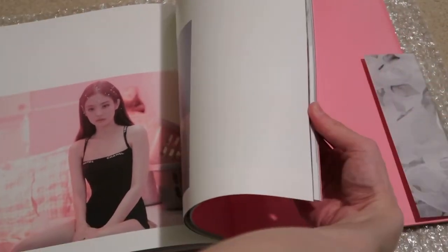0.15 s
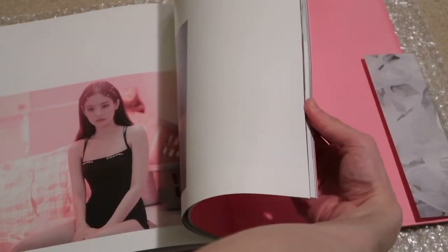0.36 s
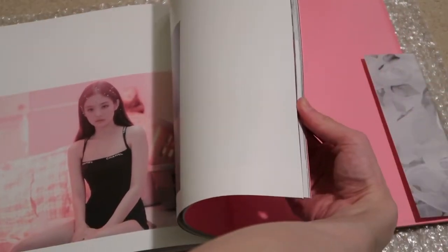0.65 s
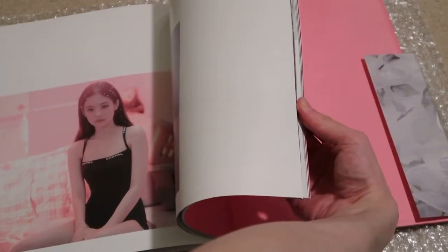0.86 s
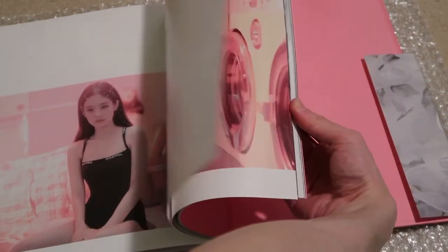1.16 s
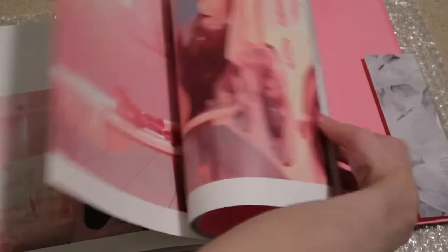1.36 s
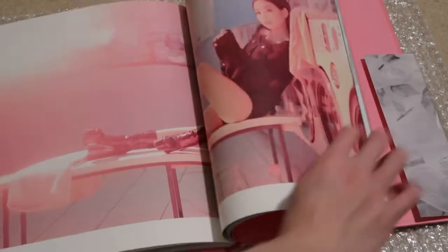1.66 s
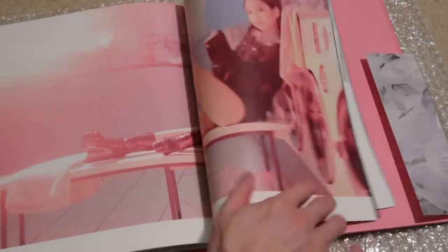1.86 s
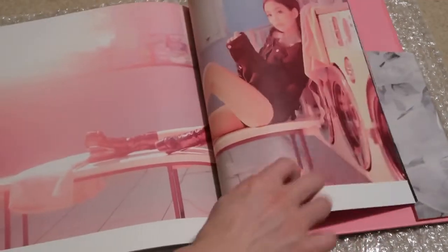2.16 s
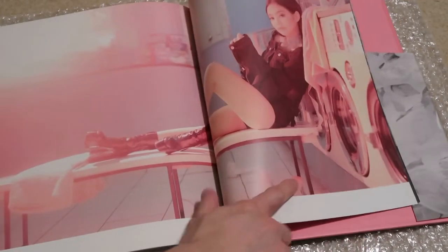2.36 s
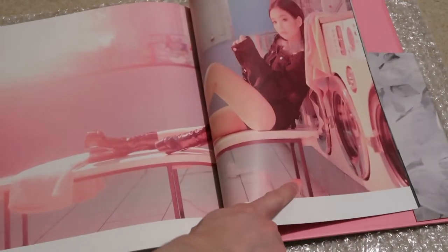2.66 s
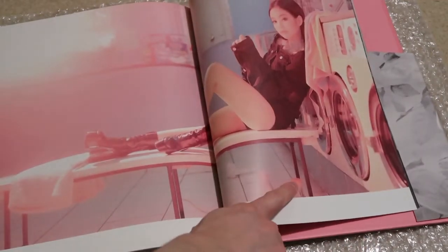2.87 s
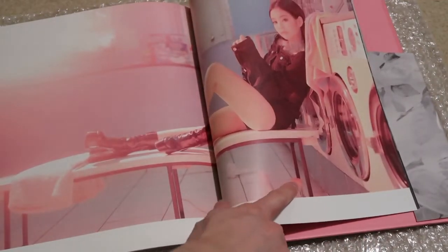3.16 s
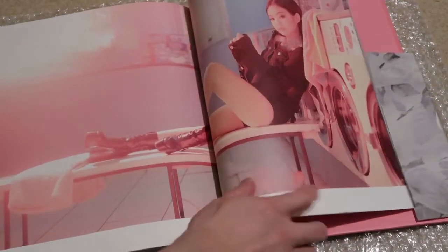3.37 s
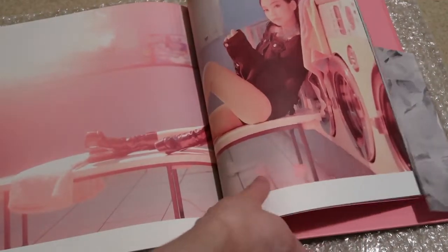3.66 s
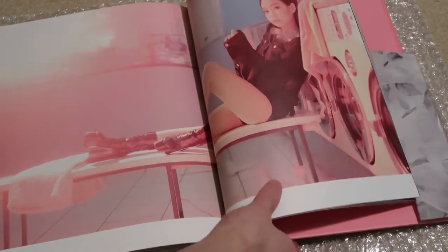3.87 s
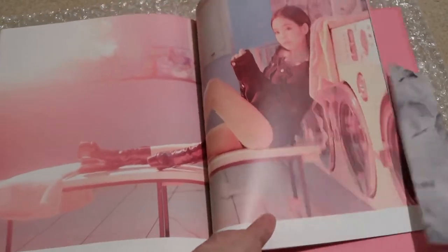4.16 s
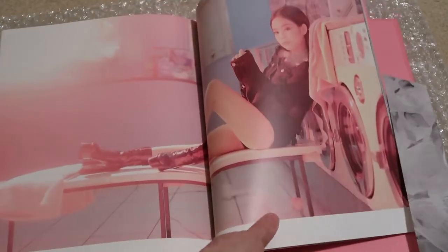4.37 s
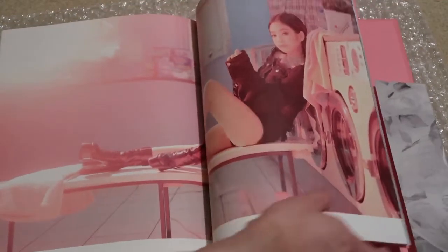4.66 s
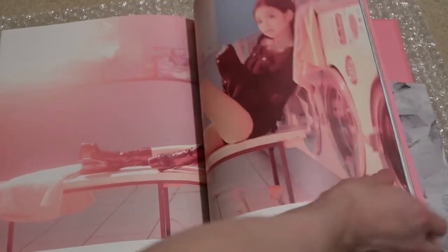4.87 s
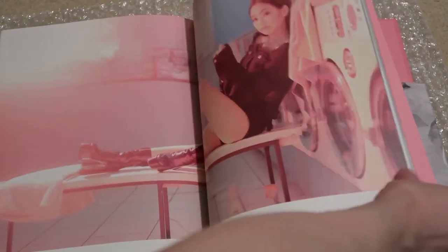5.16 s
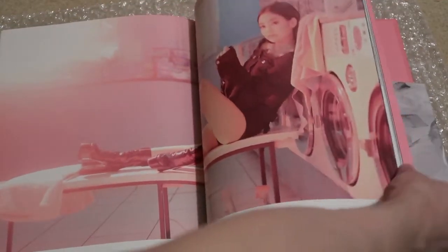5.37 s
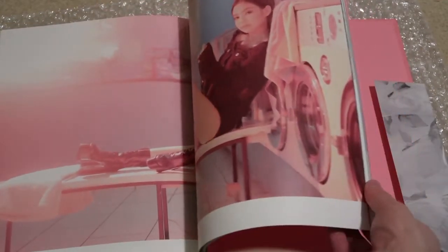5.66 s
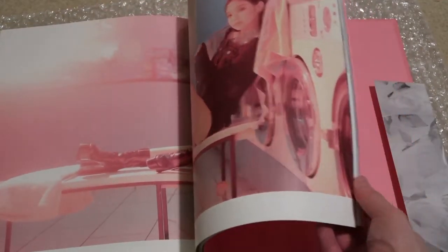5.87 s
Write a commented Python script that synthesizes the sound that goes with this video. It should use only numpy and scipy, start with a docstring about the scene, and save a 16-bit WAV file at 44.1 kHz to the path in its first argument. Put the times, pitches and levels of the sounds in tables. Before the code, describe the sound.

Close stereo microphone in a small, quiet room. A hand holds bent glossy pages almost silently, then rustles and drops them with a crisp double snap around two seconds. Quiet follows, then a soft rub and hollow tap, and a louder cluster of flaps and cracks around four seconds. Light rubs and small ticks trail off over low room rumble and faint hiss.

```python
"""In a quiet small room a hand bends, drops and smooths the thick glossy pages of a book, close by.
Trains of tiny slips excite the page modes: dying clumps make snaps, swelling ones rubs and flaps.
Short ringing blips are decaying, roughened tones, and a short tail of decaying noise follows.
Beneath lie shaped noise (shared rumble, hiss that differs left and right), a wavering hum that
fades out near 2 s, a low drone of resonated noise, and a thin, high, throbbing whine."""
import sys
import numpy as np
from scipy import signal
from scipy.fft import rfft, irfft
from scipy.io import wavfile
from scipy.ndimage import uniform_filter1d

SR = 44100
rng = np.random.default_rng(int(sys.argv[2]) if len(sys.argv) > 2 else 0)


def put_to_file(sound):
    """Save the sound as 16-bit audio at rate SR, in the file named by the first command-line argument."""
    columns = np.atleast_2d(sound).T  # one column per channel
    safe = np.clip(columns, -1, 1)
    whole_steps = np.round(safe * 32767)
    wavfile.write(sys.argv[1], SR, whole_steps.astype(np.int16))


def ratio(d):
    """dB to gain"""
    e = np.asarray(d, float) / 20
    return 10 ** e


N = 265482

# resonant modes of the pages: (frequency [Hz], bandwidth [Hz], gain on the driving slips [dB])
PAGE_MODES = [(210, 50, -6), (300, 124, -2.5), (417, 11, 3.5), (600, 127, 2.5), (1097, 210, 20.5),
              (1510, 1350, 9), (2000, 200, 11.5), (2650, 170, -14), (3600, 1670, 6.5), (4748, 370, 0),
              (5480, 1450, 39), (7960, 12000, 0)]


def evened(x):
    """Normalisation by mean power: scales to rms 1."""
    return x / np.sqrt(np.mean(x ** 2) + 1e-20)


def read(points, hz):
    """Spectral interpolation: reads a value on a log-frequency axis."""
    f, value = np.transpose(points)
    return np.interp(np.log(hz + 1), np.log(f + 1), value)


def resonate(x, hz, bandwidth):
    """Damped resonance: one complex pole, with gain 1 at its centre."""
    radius = np.exp(-np.pi * bandwidth / SR)
    pole = radius * np.exp(2j * np.pi * hz / SR)
    return 2 * signal.lfilter([1 - radius], [1, -pole], x).real


def air():
    """Partly coherent noise, drone and throbbing whine, with a wavering hum that fades out near 2 s."""
    # spectrum of the air: (frequency [Hz], relative level per Hz [dB])
    air_spectrum = [(12, -41), (20, -6), (38, -0.5), (129, -2.5), (238, -10), (274, -9), (306, -7.5),
                    (393, -10), (581, -15), (1130, -17), (2030, -22), (2400, -21.5), (7950, -33),
                    (12900, -41.5), (13250, -42), (15500, -56)]
    # difference between the ports: (frequency [Hz], side over mid [dB])
    air_side = [(60, -52), (120, -13), (240, -0.5), (480, 1.5), (950, 2), (1890, 2.5), (3770, 1.5),
                (7520, 1), (15000, 2.5)]
    # wavering of the hum: (time [s], rms level [dB])
    hum_levels = [(0, -72), (.1, -54), (.35, -74), (.7, -56.5), (.86, -65.5), (1.13, -53.5), (1.6, -59.5),
                  (1.9, -60), (2.1, -92), (6.1, -105)]
    air_db = -53  # rms of the mid
    hum_hz = 142
    drone_hz, drone_width_hz, drone_db = 103.5, 19.0, -59.5  # a low resonance of the house
    whine_hz, whine_db = 13019, -80  # rms, ahead of the microphone roll-off
    throb_hz, throb_depth = 24.05, 0.95

    frame_count, hz, t = N // 256 + 5, np.fft.rfftfreq(1024, 1 / SR), np.arange(N) / SR
    real, imag, patches = rng.standard_normal((3, 2, frame_count, 513)).transpose(0, 1, 3, 2)
    patches = evened(uniform_filter1d(uniform_filter1d(patches[0], 10, 0), 12, 1))
    # slightly patchy in time and frequency
    spectrum = (real + 1j * imag) * ratio(read(air_spectrum, hz)[:, None] + 2.2 * patches)
    spectrum[1] *= ratio(read(air_side, hz))[:, None]
    mid, side = signal.istft(spectrum, nperseg=1024, noverlap=768)[1][:, :N]
    noise = ratio(air_db) / np.std(mid) * np.array([mid + side, mid - side])

    hum_gain = np.sqrt(2) * ratio(np.interp(t, *np.transpose(hum_levels)))
    hum = hum_gain * np.sin(2 * np.pi * hum_hz * t)

    drone = resonate(rng.standard_normal(N), drone_hz, drone_width_hz)
    drone = ratio(drone_db) * evened(resonate(drone, drone_hz, drone_width_hz))

    port_phase = np.array([[0], [np.pi / 2]])
    throb = 1 + throb_depth * np.sin(2 * np.pi * throb_hz * t)
    whine = ratio(whine_db) * evened(np.sin(2 * np.pi * whine_hz * t + port_phase) * throb)
    return noise + hum + drone + whine


def room(x):
    """Reverberation: near walls and table add a short diffuse tail, heard differently by two ports."""
    # stereo spread of the paper tail: (frequency [Hz], side over mid [dB])
    tail_side = [(60, -22), (150, -24), (380, -21), (950, -25), (2380, -13.5), (5980, -4.5), (15000, 4)]
    t = np.arange(SR // 4) / SR
    t60_s = np.array([[0.25], [0.08]])  # mid, side
    delay_s = np.array([[0.004], [0]])
    tails = rng.standard_normal((2, len(t))) * ratio(-60 * t / t60_s) * (t > delay_s)
    tails /= np.linalg.norm(tails, axis=1)[:, None]
    wet, side = signal.fftconvolve(x[None], tails, axes=1)[:, :N]
    side = irfft(rfft(side) * ratio(read(tail_side, np.fft.rfftfreq(N, 1 / SR))), N)
    mid = x + ratio(-10.5) * wet
    return np.array([mid + side, mid - side])


def crackle(count, per_s, spread_db, hiss):
    """Stick-slip friction: sparse slips of very uneven size over a little smooth noise."""
    chance, size = rng.random(count), rng.exponential(1, count)
    noise = rng.standard_normal((2, count))
    slips = (chance < per_s / SR) * ratio(spread_db * np.minimum(size, 4)) * np.sign(noise[0])
    return evened(slips) + hiss * noise[1]


def paper(drive, plain_db):
    """Modal superposition: in each band the drive itself joins the page modes that fall there."""
    # boom, crack and sizzle: (lower edge [Hz], upper edge [Hz])
    bands_hz = [(220, 900), (900, 4700), (4300, 14000)]
    parts = []
    for lo, hi in bands_hz:
        rung = ratio(plain_db) * drive
        for hz, bandwidth, db in PAGE_MODES:
            if lo <= hz < hi:
                rung = rung + ratio(db) * resonate(drive, hz, bandwidth)
        band = signal.butter(2, [lo, hi], "bandpass", fs=SR, output="sos")
        parts.append(signal.sosfilt(band, rung))
    return parts


def pings():
    """Free decay: short blips ring near one pitch, roughened by narrow-band noise."""
    # short ringing blips, the earliest only faint pips in the background noise:
    # (onset [s], decay level at onset [dB], frequency [Hz])
    ping_table = [(0.07, -51, 4030), (0.218, -52, 2320), (0.452, -46, 1233), (0.713, -51, 2390),
                  (0.715, -51, 1104), (1.458, -44, 664), (1.785, -36.5, 324), (1.825, -38, 334),
                  (2.076, -36.5, 6000), (2.094, -25, 600), (2.225, -43, 1090), (2.255, -42, 1120),
                  (2.283, -46, 3500), (2.3372, -26, 2000), (2.3375, -28, 3450), (2.35, -33, 1080),
                  (2.355, -34, 3670), (2.362, -34, 582), (2.482, -40.5, 600), (3.509, -40, 1600),
                  (3.5105, -24, 637), (3.515, -35.5, 214), (3.838, -40, 571), (3.884, -38, 560),
                  (4.015, -26.5, 422), (4.109, -23, 1370), (4.11, -25.5, 300), (4.13, -28, 415),
                  (4.163, -29, 506), (4.21, -32, 436), (4.487, -42, 595), (4.598, -50, 6000),
                  (4.761, -44.5, 4170), (4.849, -45, 1016), (5.44, -44, 1060), (5.828, -47, 753),
                  (5.978, -50, 1200), (5.979, -48, 2650)]
    t60_1khz_s, t60_per_octave = 0.051, 0.77  # higher blips die sooner
    faint_count, faint_db = 24, -60.5

    out, t = np.zeros(N + SR), np.arange(SR // 5) / SR
    # the bent pages creak at random moments on their own modes
    when, size, mode = rng.random((faint_count, 3)).T
    faint_hz = np.array(PAGE_MODES)[4:9, 0][(mode * 5).astype(int)]
    faint = zip(when * N / SR, faint_db + 6 * (size - 0.5), faint_hz)
    for s, db, hz in [*ping_table, *faint]:
        t60 = np.clip(t60_1khz_s * t60_per_octave ** np.log2(hz / 1000), 0.01, 1)
        onset = 1 - np.exp(-t / (0.024 * t60 + 0.37 / hz))
        fade = ratio(db - 60 * t / t60) * onset
        rough = evened(resonate(rng.standard_normal(len(t)), hz, 60 + 0.038 * hz))
        out[round(s * SR):][:len(t)] += fade * (np.sin(2 * np.pi * hz * t) + 0.52 * rough)
    return out[:N]


def patchy(x, spread_db):
    """Random modulation: level changes make the rustle patchy in time and frequency."""
    spectrum = signal.stft(x, nperseg=256, noverlap=192)[2]
    patches = rng.standard_normal(spectrum.shape)
    patches = uniform_filter1d(uniform_filter1d(patches, size=4, axis=0), size=12, axis=1)
    spectrum = spectrum * ratio(spread_db * evened(patches))
    return signal.istft(spectrum, nperseg=256, noverlap=192)[1][:len(x)]


def swell(peak, rise, fall):
    """Exponential envelope: samples and gain of a gesture that grows to its peak and dies away."""
    slope_db = 20.5  # level lost over one rise or fall time
    at = slice(round((peak - 3 * rise) * SR), min(round((peak + 3 * fall) * SR), N))
    t = np.arange(at.start, at.stop) / SR - peak
    return at, ratio(-slope_db * np.where(t < 0, -t / rise, t / fall))


def rubs():
    """Sliding friction: dense clumped slips, coloured by the contact spot; flaps sound low modes only."""
    # skin and pages slide: (peak time [s], rise [s], fall [s], body level at the peak [dB],
    # colour frequency [Hz], colour over the plain rustle [dB])
    stroke_table = [(1.46, 0.057, 0.22, -56, 3100, -12), (1.77, 0.091, 0.25, -52, 3650, 4),
                    (1.91, 0.11, 0.062, -50, 4650, 9), (1.99, 0.11, 0.11, -55, 3700, 8),
                    (2.06, 0.098, 0.061, -48.5, 3600, 3), (2.23, 0.18, 0.11, -52.5, 2070, -3),
                    (2.331, 0.029, 0.037, -44.5, 2620, -4), (2.385, 0.035, 0.049, -53, 3460, 10),
                    (2.483, 0.074, 0.074, -54.5, 2780, 3), (2.609, 0.079, 0.089, -60.5, 5130, -2),
                    (3.389, 0.053, .12, -40, 2400, 1.5), (3.475, 0.013, 0.038, -59.5, 2950, -17),
                    (3.58, 0.052, 0.11, -54, 2100, -6), (3.69, 0.038, 0.14, -50, 3300, 0),
                    (3.838, 0.028, .06, -53.5, 3150, -7), (3.9, 0.033, 0.099, -47.5, 2000, 0),
                    (3.978, .035, 0.037, -54, 2720, -13), (4.024, 0.029, 0.067, -41.5, 2750, -6),
                    (4.08, 0.039, 0.055, -49.5, 2680, 6), (4.14, 0.043, 0.079, -39, 2750, -7),
                    (4.18, 0.077, 0.084, -62.5, 5100, -7), (4.235, 0.065, 0.04, -49.5, 2950, -12),
                    (4.3, .04, .12, -55, 3220, -1), (4.516, 0.13, 0.087, -51, 3200, -8),
                    (4.596, 0.033, 0.13, -51.5, 3070, -6), (4.758, 0.027, 0.12, -52, 3840, 8),
                    (4.9, 0.086, 0.18, -57.5, 3600, 0), (5.14, 0.098, 0.073, -57, 2420, -7),
                    (5.27, 0.094, 0.095, -51.5, 3500, 13), (5.45, 0.036, 0.06, -56, 3180, 3),
                    (5.55, .13, 0.47, -59.5, 2700, -5), (5.955, .013, .25, -60.5, 2500, -7)]
    # a loose page pushes air: (peak time [s], rise [s], fall [s], level at the peak [dB])
    flap_table = [(1.716, 0.0038, 0.045, -43), (1.8, 0.071, 0.093, -48.5), (2.125, 0.033, 0.052, -50.5),
                  (2.27, 0.16, 0.084, -49.5), (3.545, 0.09, .05, -48), (3.9, 0.035, 0.044, -42.5),
                  (4.026, 0.018, 0.054, -41), (4.17, 0.023, 0.11, -43.5), (4.39, 0.18, 0.056, -58),
                  (5.838, 0.055, 0.027, -58.5)]
    boom_base_db = -7.5  # over the body, at a colour of 0 dB
    sizzle_base_db, sizzle_db_per_octave = -11, 9.5  # same, at 2.5 kHz; higher contact hisses more
    focus = 0.46  # dB of boom and sizzle lost for each dB of colour
    colour_width = 0.57  # share of the colour frequency

    out = np.zeros(N)
    clumps = ratio(1.3 * evened(uniform_filter1d(rng.standard_normal(N), 400)))
    slips = patchy(crackle(N, 5000, 2.8, 0.57) * clumps, 2.94)
    for peak, rise, fall, db, hz, colour_db in stroke_table:
        at, gain = swell(peak, rise, fall)
        colour = resonate(slips[at], hz, colour_width * hz)
        colour = resonate(colour, hz, colour_width * hz)
        boom, rustle, sizzle = map(evened, paper(slips[at], -13.5))
        body = evened(rustle + ratio(colour_db) * evened(colour))
        boom_db = boom_base_db - focus * colour_db
        sizzle_db = sizzle_base_db + sizzle_db_per_octave * np.log2(hz / 2500) - focus * colour_db
        out[at] += ratio(db) * gain * (body + ratio(boom_db) * boom + ratio(sizzle_db) * sizzle)

    low = evened(paper(slips[::-1], -1.4)[0])  # reversed, so flaps do not copy the strokes
    for peak, rise, fall, db in flap_table:
        at, gain = swell(peak, rise, fall)
        out[at] += low[at] * ratio(db) * gain
    return out


def snaps():
    """Impulsive excitation: a dying clump of slips rings the freed part of the sheet at its own pitch."""
    # the sheet buckles or is tapped: (onset [s], crack level [dB], ring frequency [Hz],
    # boom over crack [dB], sizzle over crack [dB])
    snap_table = [(1.007, -56.5, 6850, 4.5, 1), (1.459, -55.5, 650, 14, -6), (1.713, -46, 646, -10, -12),
                  (1.986, -54, 3820, 4.5, -15), (2.073, -32, 6130, -7, -8), (2.081, -39, 1750, 4, -13),
                  (2.089, -29.5, 3670, -7.5, -32), (2.096, -30.5, 3420, -5, -12.5),
                  (2.151, -46.5, 2550, -10, -8), (2.19, -45, 3440, -5, -12),
                  (2.3367, -30.5, 1960, -10, -25), (2.3475, -36, 2010, -1.5, -9),
                  (2.599, -69, 4900, -7, 14.5), (3.51, -52.5, 636, 13, -21), (3.69, -45, 5370, -1.5, 2.5),
                  (3.872, -33, 1570, -3, -11), (3.883, -40.5, 580, 7.5, -7.5),
                  (4.012, -32.5, 3660, -15, -10), (4.053, -41.5, 410, 3.5, -19), (4.072, -50, 418, 9, -12),
                  (4.1083, -21.5, 2735, -1.5, -5.5), (4.1131, -29, 2650, -4, -9.5),
                  (4.118, -27.5, 3600, -13, -25), (4.129, -32, 406, 1.5, -8), (4.165, -44, 510, 0, -9),
                  (4.206, -38, 480, -4, -16), (4.443, -47.5, 3500, 0.5, -14), (4.76, -61, 4200, -14, 8),
                  (5.136, -48.5, 3600, -6.5, -15), (5.4047, -50.5, 1000, 9, -13), (5.951, -55, 650, 4, -9)]
    t60_s, attack_s = 0.07, 0.00017

    out, t = np.zeros(N + SR), np.arange(SR // 4) / SR
    fade = ratio(-60 * t / t60_s) * np.minimum(t / attack_s, 1)
    scale = np.sqrt(np.sum(fade ** 2) / np.max(fade) ** 2)  # a steady part would have rms 1
    for s, crack_db, hz, boom_db, sizzle_db in snap_table:
        drive = crackle(len(t), 3500, 5, 0.45) * fade
        drive[20] += 6  # one sharp slip near the start
        drive = signal.lfilter(*signal.butter(1, 7000, fs=SR), drive)  # a crease takes time to flip
        drive = drive + ratio(9) * resonate(drive, hz, 32 + 0.032 * hz)
        levels_db = (crack_db + boom_db, crack_db, crack_db + sizzle_db)
        for part, db in zip(paper(drive, -3), levels_db):
            out[round(s * SR):][:len(t)] += ratio(db) * scale * part / np.linalg.norm(part)
    return out[:N]


def scene():
    """Linear superposition: paper in the room over the background air."""
    return room(snaps() + pings() + rubs()) + air()


def roll_off(x):
    """The treble ends steeply here."""
    return signal.sosfilt(signal.butter(12, 15660, fs=SR, output="sos"), x)


def record(dry):
    """Low-pass response: the microphone rolls off above 14 kHz."""
    rolloff = signal.butter(N=4, Wn=14000, fs=SR, output="sos")
    mix = signal.sosfilt(rolloff, dry)
    return roll_off(mix)


dry = scene()
out = record(dry)
put_to_file(out)
```